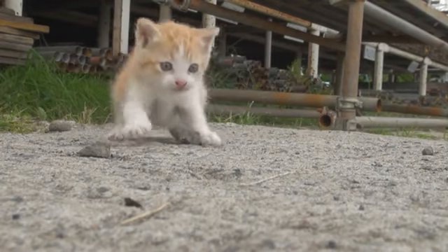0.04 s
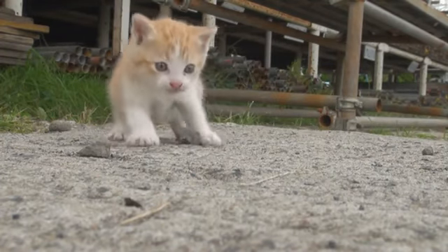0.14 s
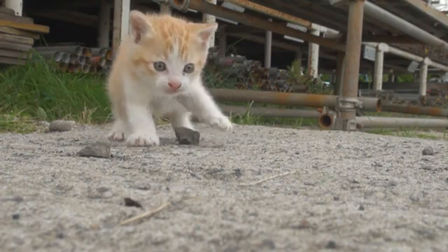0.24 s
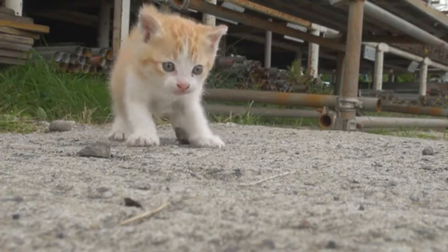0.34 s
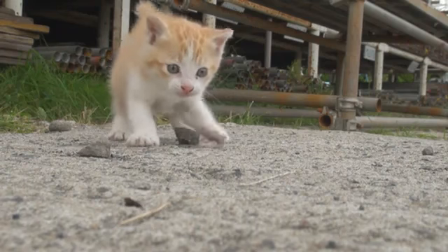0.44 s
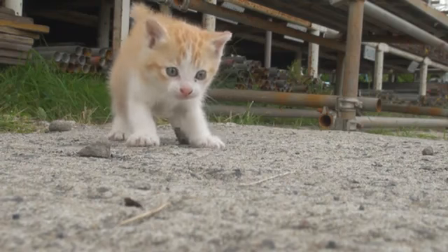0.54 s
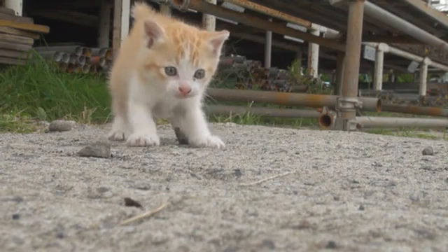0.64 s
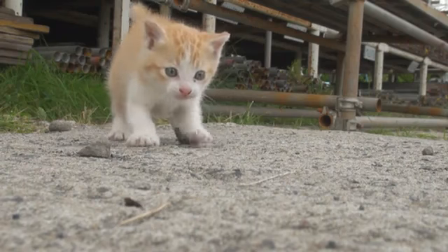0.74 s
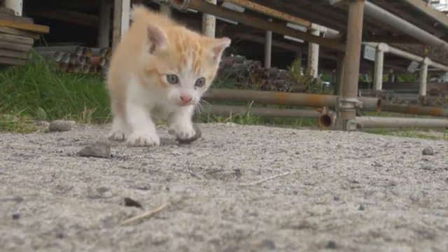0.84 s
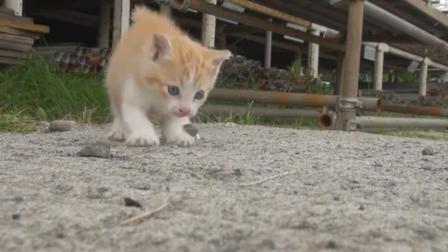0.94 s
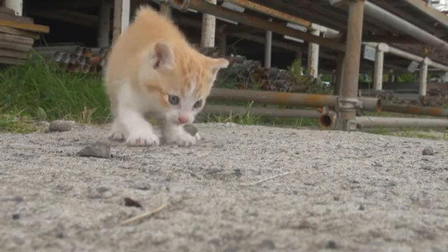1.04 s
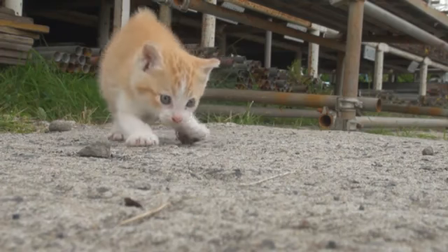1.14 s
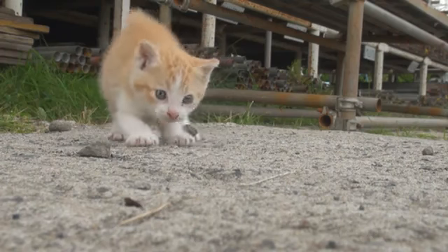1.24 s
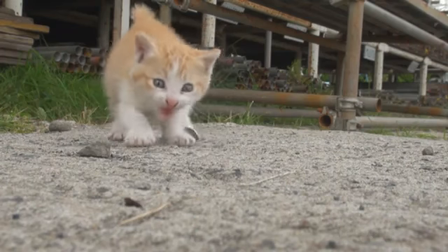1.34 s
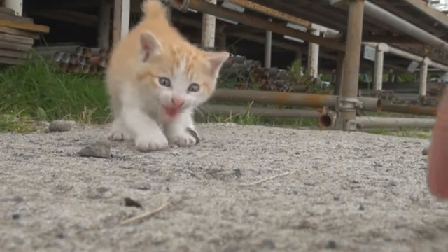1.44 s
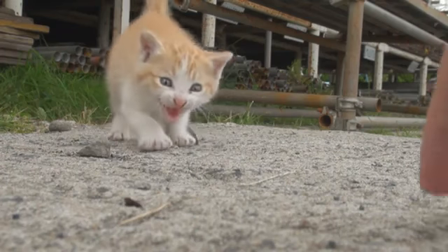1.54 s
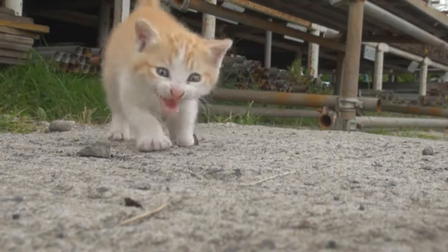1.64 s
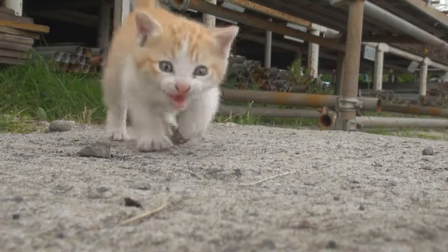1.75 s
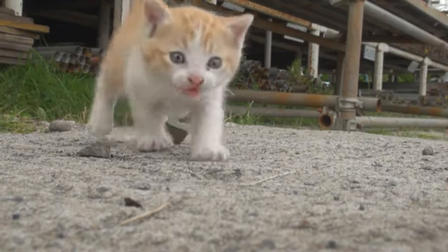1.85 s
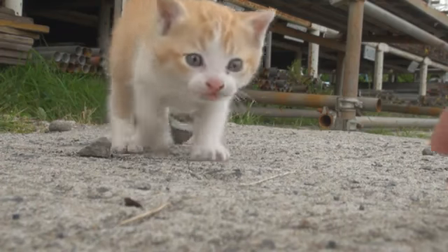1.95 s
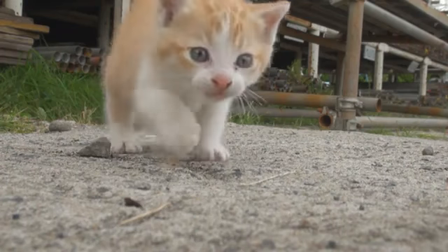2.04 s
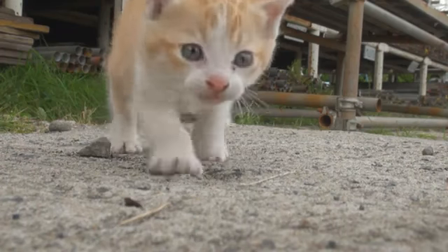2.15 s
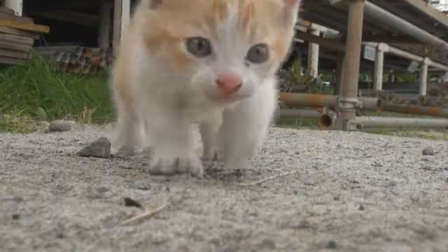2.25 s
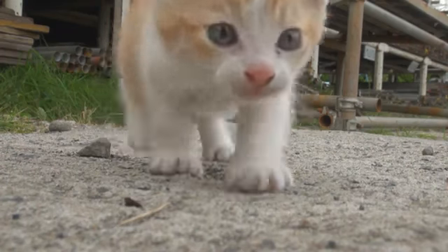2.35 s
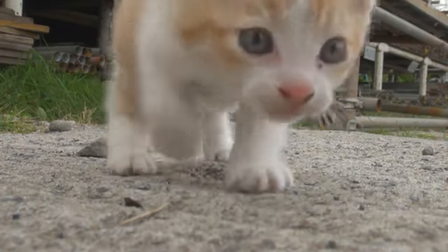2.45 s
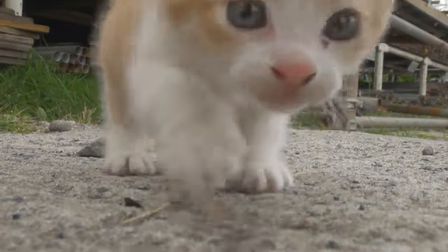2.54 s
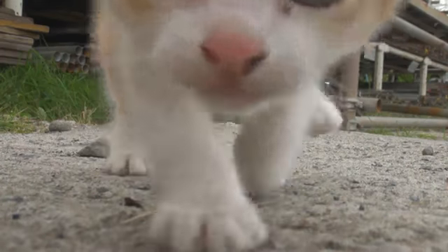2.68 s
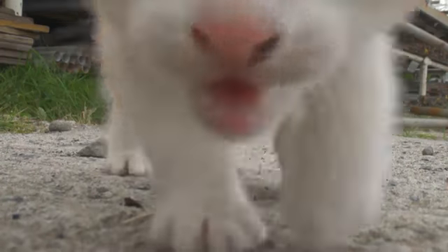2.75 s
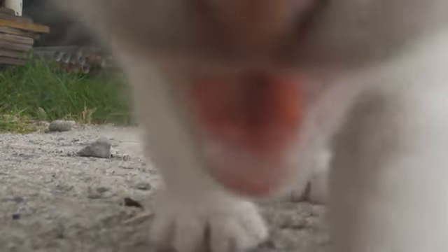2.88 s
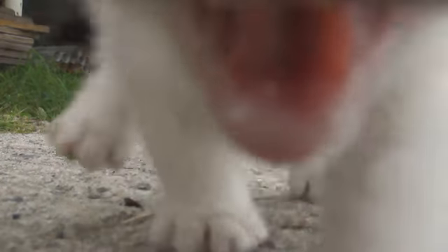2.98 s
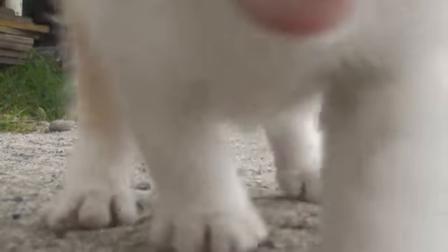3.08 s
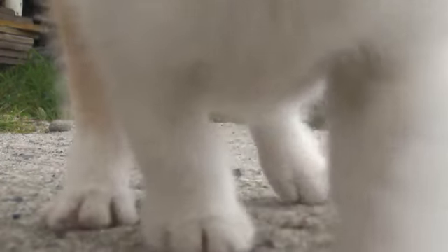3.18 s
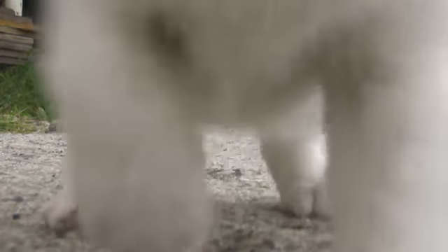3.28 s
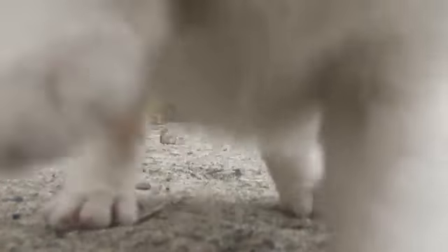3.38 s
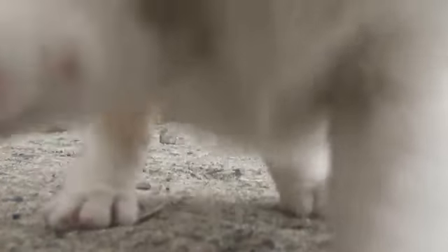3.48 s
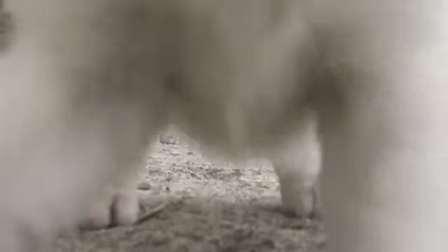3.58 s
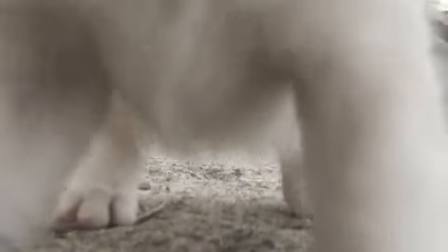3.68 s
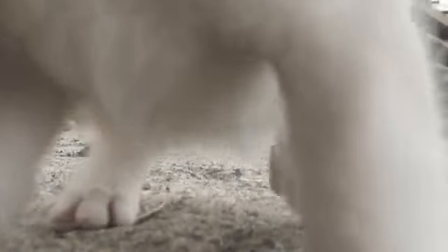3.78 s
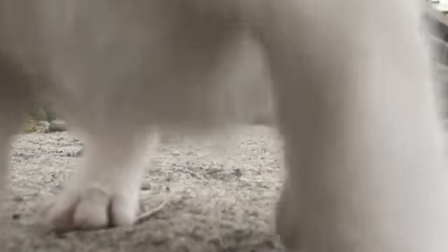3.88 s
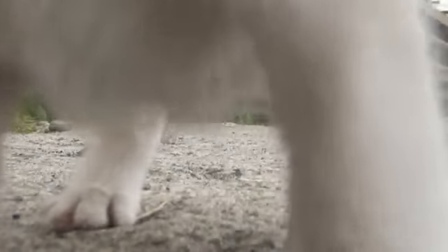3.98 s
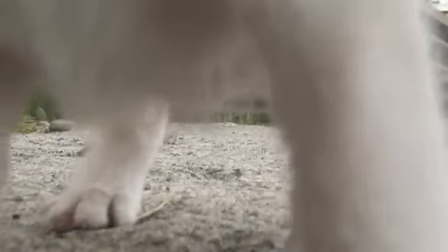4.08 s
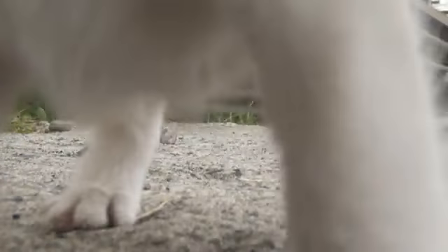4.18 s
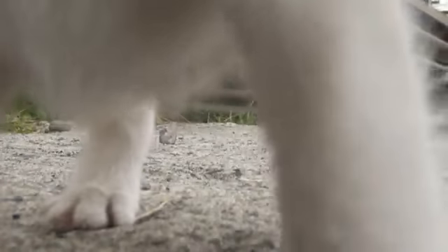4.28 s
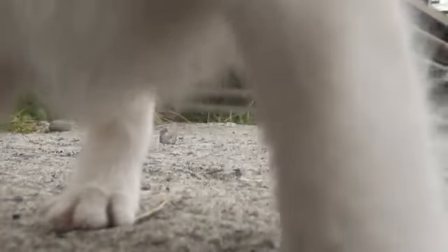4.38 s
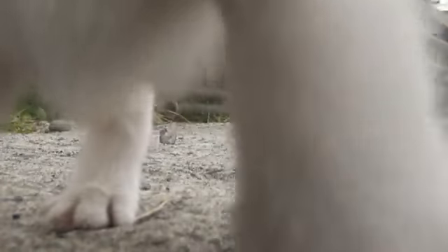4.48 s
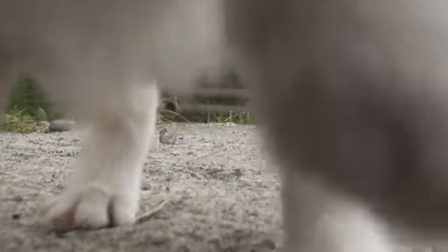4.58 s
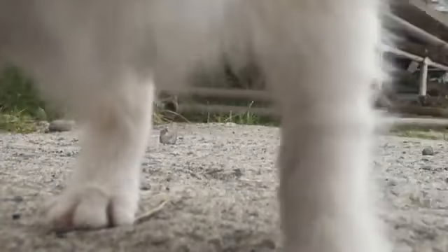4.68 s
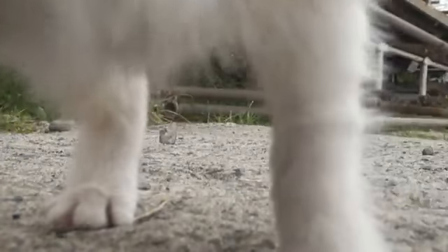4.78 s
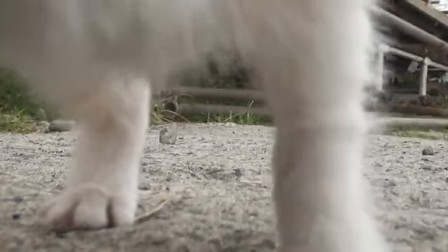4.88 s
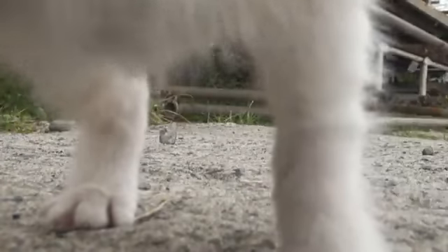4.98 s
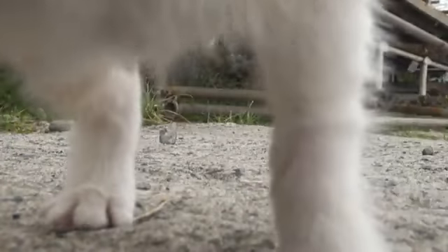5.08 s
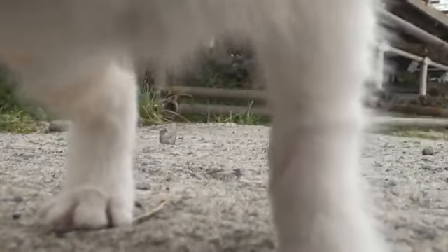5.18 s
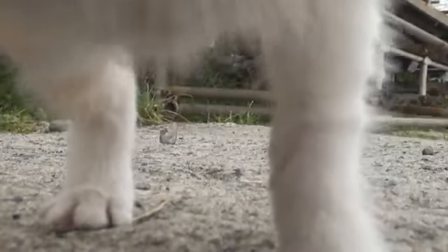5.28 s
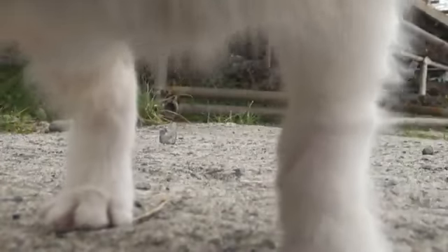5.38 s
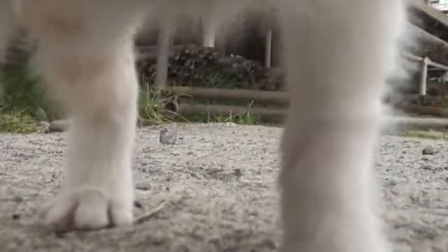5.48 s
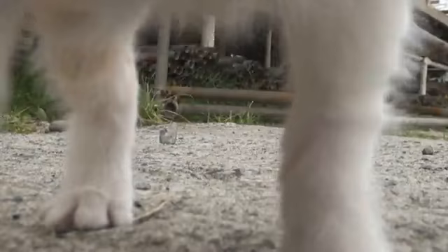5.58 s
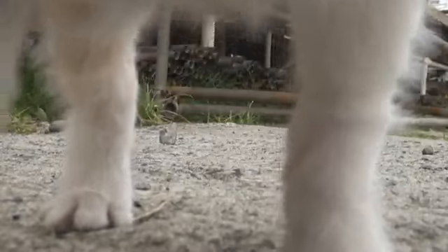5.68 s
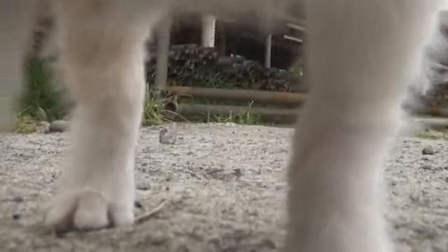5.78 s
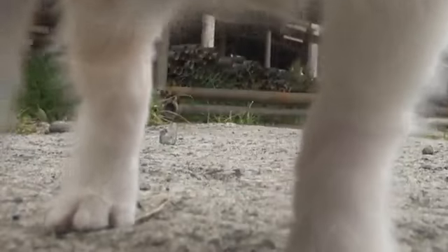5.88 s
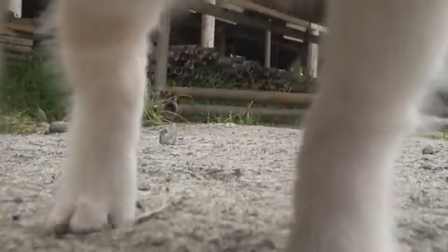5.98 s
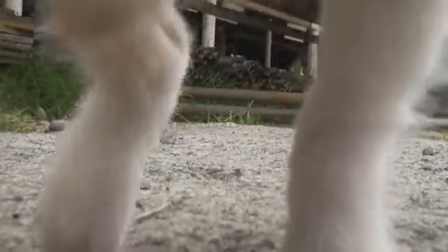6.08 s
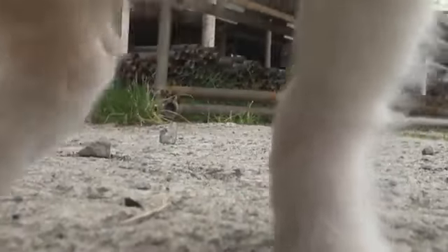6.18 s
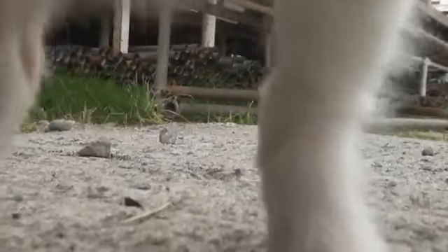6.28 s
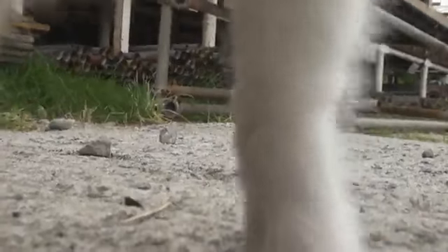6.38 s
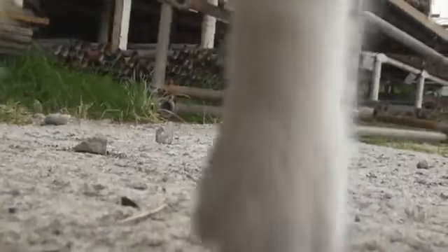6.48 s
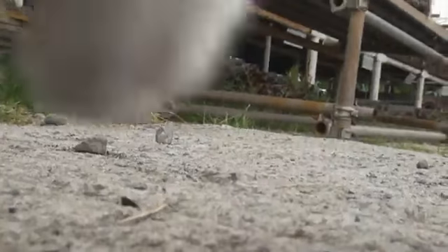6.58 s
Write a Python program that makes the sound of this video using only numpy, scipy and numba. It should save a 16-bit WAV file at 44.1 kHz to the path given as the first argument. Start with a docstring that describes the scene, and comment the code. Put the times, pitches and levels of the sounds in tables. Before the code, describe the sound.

A low rumble and hum run throughout in an open yard. For the first second and a half a soft rustle swells and fades, and from about 0.2 to 1 second a thin, wavering whine sounds far off to the left. At 1.5 seconds a very young kitten gives a high mew of half a second, rising and falling in pitch. A much louder mew follows right at the microphone from 3 to 3.6 seconds, slightly overloading it. Two more close mews come from 4.6 to 5.3 and from 5.6 to 6.5 seconds, a little lower and hoarse at the edges. Each ends with a small puff of air and a soft bump. Sparse ticks of grit under the paws and wet mouth clicks fall between the calls, clearest just before the third. A short, sharp knock close to the microphone comes at 6.6 seconds.

```python
"""A concrete yard, a camera on the ground. A very young kitten walks up and mews four times, at last
right at the microphone. Each mew is a train of sharp vocal-fold pulses that arches in pitch and rings a
closing mouth; the near ones overload the recorder. First a thin whine comes from far off through a soft
rustle. Grit ticks under the paws, and a low hum runs underneath."""
import sys
import numpy as np
from scipy import signal
from scipy.fft import rfft, irfft
from scipy.io import wavfile
from scipy.ndimage import uniform_filter1d, map_coordinates
from numba import njit

SR = 44100
rng = np.random.default_rng(int(sys.argv[2]) if len(sys.argv) > 2 else 0)


def inscribe(sig):
    """Save sig as 16-bit PCM at rate SR to the path in sys.argv[1].

    A 1-D sig is mono; a 2-D sig holds one channel per row.
    Samples are clipped to [-1, 1] before scaling.
    """
    pcm = np.round(np.clip(np.atleast_2d(sig).T, -1, 1) * 32767)
    wavfile.write(sys.argv[1], SR, pcm.astype(np.int16))


N = 292369
TIME = np.arange(N) / SR

# rumble and air of the yard: (frequency [Hz], relative density [dB])
YARD_COLOUR = [(13, -56), (22, -15), (48, -3.5), (70, -0.5), (91, -5), (128, -2.5), (150, -3.5), (222, -4),
               (396, -15), (440, -14), (1200, -20.5), (3080, -28), (5490, -34), (8810, -39.5),
               (11800, -42.5), (15300, -82), (22000, -120)]
# how alike the yard sounds at the microphone's two ports: (frequency [Hz], likeness [0-1])
YARD_LIKENESS = [(60, 1), (130, 1), (270, 1), (570, 0.79), (1200, 0.57), (2530, 0.62), (5350, 0.92),
                 (11300, 0.78)]
# tones of the hum: (frequency [Hz], level [dB])
HUM_TONES = [(60, -57), (120.3, -38), (152, -47)]
# the background dips as the kitten stands over the microphone: (middle [s], half length [s], depth [dB])
YARD_DIPS = [(4.944, 0.19, -16), (5.443, 0.12, -5), (5.81, 0.11, -5.5)]
# swell of the rustle: (time [s], level [dB])
RUSTLE_SWELL = [(0.0, -38.5), (0.106, -35), (0.18, -42.5), (0.404, -30), (0.918, -36), (0.988, -29.5),
                (1.438, -46.5), (1.48, -41)]
# spectrum of its hiss: (frequency [Hz], relative density [dB])
RUSTLE_SPECTRUM = [(1180, -27), (2000, 3.5), (2520, 2), (3340, 1.5), (3840, 3.5), (5520, 2.5), (8680, -2.5),
                   (11800, -13), (15300, -47), (22000, -120)]
# the far whine: (time [s], pitch [Hz], level [dB], overtones against the fundamental [dB])
WHINE_PATH = [(.174, 576, -26, -1), (.2, 620.6, -21, -6), (0.227, 748, -42, 13), (0.309, 850, -30.5, -11),
              (.375, 1200, -37, -3), (.415, 1156, -58, -12), (.452, 871, -27, -19),
              (0.529, 909, -28.5, -10), (.595, 1110, -32, -23), (.638, 865, -31, -9), (.82, 826, -39.5, 8),
              (0.933, 888, -30, -15), (1.05, 820, -40, -2)]
# air let out as the mouth shuts: (time [s], length [s], level at the crest [dB])
MOUTH_PUFFS = [(1.958, 0.032, -38), (3.514, 0.086, -13), (5.255, 0.079, -16), (6.429, 0.077, -25.5)]
# spectrum of that air: (frequency [Hz], relative density [dB])
PUFF_SPECTRUM = [(240, -34), (400, 8), (756, 14), (1050, 7), (1980, 12), (2280, 7), (3110, 8.5), (4760, 7),
                 (6870, 18.5), (8370, 0), (11800, 9), (15300, -34), (22000, -120)]
# bumps and a last knock, close up: (time [s], length [s], pitch [Hz], width [Hz], level [dB])
CLOSE_BUMPS = [(1.961, 0.014, 758, 600, -31.5), (3.537, 0.032, 423, 218, -16),
               (5.195, 0.032, 84.15, 108.5, -17), (5.272, 0.021, 794, 495.7, -26),
               (6.28, 0.011, 1090, 900, -19.5), (6.442, 0.045, 397, 222, -27.5),
               (6.6245, 0.0048, 1300, 900, 1)]
# grit and wet mouth clicks: (time [s], peak [dB], centre [Hz])
GRIT_AND_CLICKS = [(2.2177, -21.5, 4570), (2.477, -28, 5000), (3.725, -26.5, 9150), (3.807, -27, 5000),
                   (4.411, -21.5, 8000), (4.587, -18, 6900), (4.596, -12.5, 1800), (4.599, -25, 9550),
                   (4.605, -9.5, 10200), (5.603, -23, 5800), (6.612, -23, 5000)]
# voice of each mew: (relative throat level with jaw open [dB], with jaw shut [dB],
# relative edge level [dB], breathiness [0-1], damping [factor], treble pan to the left [dB])
MEW_VOICES = [(-4.5, -2.5, -21, .06, 1.7, -1.5), (-18, 3, 1.5, 0.06, 1.48, -1.5),
              (-25, 6, -7.5, .09, 1.04, 3), (2, -15.5, -27, 0.04, 1.19, 5)]
# pitch arch, one list a mew: (time [s], pitch [Hz])
MEW_PITCHES = [
    [(1.49, 274), (1.514, 405), (1.554, 441), (1.655, 647), (1.712, 679.5), (1.75, 602), (1.838, 497),
     (1.918, 221), (1.96, 174)],
    [(2.95, 305), (2.986, 453), (3.014, 399.8), (3.142, 577), (3.2, 500), (3.29, 522.3), (3.32, 510),
     (3.398, 502.7), (3.446, 525.7), (3.495, 495), (3.555, 322)],
    [(4.62, 192), (4.684, 389.7), (4.728, 411), (4.76, 448), (4.888, 485.8), (4.988, 445), (5.04, 394.6),
     (5.18, 313.6), (5.26, 195.8)],
    [(5.625, 176), (5.665, 254.6), (5.709, 385.5), (5.745, 468.5), (5.91, 546), (5.953, 575), (6.05, 560.6),
     (6.095, 573.2), (6.189, 500.7), (6.285, 408), (6.381, 353.4), (6.46, 230.5)],
]
# effort and jaw, one list a mew:
# (time [s], effort [dB], mouth resonance [Hz], upper resonance [Hz], upper against mouth [dB])
MEW_JAWS = [
    [(1.49, -35, 3900, 8200, -9), (1.53, -24, 3960, 7700, -3), (1.594, -17.5, 4070, 6500, 1),
     (1.724, -10.5, 3810, 5600, -3.5), (1.862, -21, 2900, 5800, -7.5), (1.96, -45, 2440, 6450, 2)],
    [(2.95, -27, 4530, 6850, -2), (2.972, -27, 4600, 6700, 4), (2.984, -13.5, 4770, 6400, 5.5),
     (3.11, -13.5, 5030, 5820, 6), (3.178, -7.5, 4520, 5560, -2), (3.225, -10, 4460, 5400, 1),
     (3.26, -5.5, 4140, 6670, -5), (3.392, -6, 3857, 6280, 0), (3.49, 3, 3360, 6100, -7),
     (3.555, -14.5, 3040, 6120, 0.5)],
    [(4.62, -32, 3450, 7400, -4), (4.674, -9.5, 3570, 7300, -5.5), (4.726, -10.5, 4290, 6700, 0),
     (4.822, -9.5, 3690, 6530, -4), (4.984, -10, 3100, 6500, -5.5), (5.04, -11.5, 2807, 6640, -7.5),
     (5.16, -16.5, 2600, 6846, -1), (5.285, -28, 2600, 6800, 2)],
    [(5.625, -25, 3850, 5600, -0.5), (5.66, -15, 3690, 7100, -7.5), (5.725, -18.5, 4200, 6200, 4.5),
     (5.8, -14.5, 4570, 5600, 4.5), (5.865, -20.5, 3650, 5580, 11), (5.915, -9, 3650, 5640, -1),
     (6.02, -6.5, 3520, 6020, -3.5), (6.187, -4.5, 2960, 5880, -14.5), (6.359, -16.5, 2800, 5360, -7),
     (6.46, -30.5, 2840, 5950, 0)],
]
# brief cracks of the voice: (middle [s], half length [s], added roughness [0-1])
VOICE_CRACKS = [(1.69, 0.02, 0.15), (3.12, 0.038, .24), (6.285, 0.014, 0.13)]

TOP_HZ = 16000  # band limit of the pulses and of the recorder
TAUT_HZ, SLACK_HZ = 530, 205  # pitches at which the folds start to slacken and are fully slack
OPEN_HZ, SHUT_HZ = 4100, 2455  # mouth resonance with the jaw open and nearly shut
THROAT_OPEN_HZ, THROAT_SHUT_HZ = 2160, 1505
EASY_DB, STRAINED_DB = -6.5, -4.5  # efforts between which the cry tightens into the mouth resonance
FUNDAMENTAL_DB, MEW_CEILING_DB = -18, -5  # level of the weak fundamental; ceiling on each mew's loudness
ATTACK_S, ATTACK_DB = 0.021, -2.5  # each mew swells in from this far down
ONSET_S, ONSET_ROUGH, ONSET_THROAT_DB = 0.16, 0.13, -5.5  # the voice starts hoarse and thin, then clears
CLEAR_ROUGH, SHUT_ROUGH, SLACK_ROUGH = 0.025, 0.13, 0.38
SLACK_DAMPING, CRACK_DAMPING, STRAIN_DAMPING_FACTOR = 0.87, 2.4, 0.52
SLACK_THROAT_DB, SLACK_BUZZ_DB = 13.5, 12.5
STRAIN_THROAT_DB, STRAIN_EDGE_DB, SHUT_EDGE_DB = -4, -12, -0.5


def gain_of(db):
    """Decibels to amplitude."""
    return 10 ** (np.asarray(db) / 20)


def pan(left_db):
    """Left and right gains, left_db apart."""
    return gain_of([[left_db / 2], [-left_db / 2]])


def unit_rms(x):
    """Scales to rms 1."""
    return x / np.sqrt(np.mean(x ** 2) + 1e-20)


def running_rms(x, size=600):
    """The rms over a few neighbouring pulses."""
    return np.sqrt(abs(uniform_filter1d(uniform_filter1d(x ** 2, size), size)) + 1e-14)


def levelled(x):
    """Holds the running rms at 1."""
    return x / running_rms(x)


def between(x, zero, one):
    """How far x has gone from one value to another, 0-1."""
    return np.clip((x - zero) / (one - zero), 0, 1)


def humps(rows, t):
    """Smooth humps from rows of (middle, half length, height)."""
    return sum(height * np.exp(-((t - s) / half) ** 2) for s, half, height in rows)


def follow(rows, t):
    """The columns of a curve table at the times t."""
    times, *columns = np.transpose(rows)
    return [np.interp(t, times, column) for column in columns]


def spectrum(points, count):
    """A table spread along log frequency over the FFT bins of count samples."""
    hz, value = np.transpose(points)
    return np.interp(np.log(np.fft.rfftfreq(count, 1 / SR) + 1), np.log(hz + 1), value)


def add(mix, s, sound):
    """Mixes a sound in at time s."""
    part = mix[..., max(round(s * SR), 0):][..., :sound.shape[-1]]
    part += sound[..., :part.shape[-1]]


def noise(colour, count):
    """Noise of rms 1 with a given spectrum."""
    white = rfft(rng.standard_normal(count))
    return unit_rms(irfft(white * gain_of(spectrum(colour, count)), count))


def wander(hz, count):
    """A random drift of rms 1 that rolls off above hz."""
    f = np.fft.rfftfreq(count, 1 / SR)
    white = rfft(rng.standard_normal(count))
    return unit_rms(irfft(white * np.exp(-(f / hz) ** 2) * (f > 0), count))


@njit
def ring(x, pole):
    """One complex pole that may move at every sample."""
    out, state = np.zeros(len(x)), 0j
    for i in range(len(x)):
        state = pole[i] * state + (1 - abs(pole[i])) * x[i]
        out[i] = 2 * state.real
    return out


def resonate(x, hz, width):
    """A resonance whose centre and width in Hz can follow curves."""
    return ring(x, np.exp((2j * hz - width) * np.pi / SR) * np.ones(len(x)))


def formant(x, hz, width, skirt):
    """A resonance with steep skirts, held at rms 1."""
    return levelled(resonate(resonate(x, hz, width), hz, skirt))


def low_pass(x, hz):
    """A steep low-pass on both channels."""
    taps = signal.firwin(401, hz, window=("kaiser", 8), fs=SR)
    return signal.oaconvolve(x, taps[None], "same")


def echoes(x, t60, db):
    """Sparse reflections that die away, different at each port of the microphone."""
    t = TIME[:SR // 2]
    taps = rng.standard_normal((2, len(t))) * (rng.random((2, len(t))) < .1) * gain_of(-60 * t / t60)
    taps /= np.linalg.norm(taps, axis=1, keepdims=True)
    return gain_of(db) * signal.fftconvolve(x, taps, axes=1)[:, :N]


def yard(rumble_db=-30, waver_hz=0.66, lean=0.087):
    """Rumble and faint air, mono in the bass, with a wavering hum; all dips unequally at the two ports."""
    likeness = np.clip(spectrum(YARD_LIKENESS, N), 0, .982)
    middle = irfft(rfft(noise(YARD_COLOUR, N)) * np.sqrt((1 + likeness) / 2), N)
    side = irfft(rfft(noise(YARD_COLOUR, N)) * np.sqrt((1 - likeness) / 2), N)
    out = gain_of(rumble_db) * np.array([middle + side, middle - side])
    for hz, db in HUM_TONES:
        turns = np.cumsum(hz + waver_hz * wander(2, N)) / SR
        out += gain_of(db) * unit_rms(np.sin(2 * np.pi * turns))
    return out * gain_of(np.outer([1 + lean, 1 - lean], humps(YARD_DIPS, TIME)))


def rustle(spread=0.1, grain_db=0.5, body_db=-5):
    """A soft, slightly grainy hiss near the centre that swells and dies away."""
    def hiss():
        air = noise(RUSTLE_SPECTRUM, N)
        body = unit_rms(resonate(rng.standard_normal(N), hz=2160, width=1900))
        return air + gain_of(body_db) * body

    middle, side = hiss(), spread * hiss()
    level = gain_of(follow(RUSTLE_SWELL, TIME)[0] + grain_db * wander(120, N))
    fade = np.clip((1.6 - TIME) / 0.23, 0, 1)
    return level * fade * np.array([middle + side, middle - side])


def whine(waver=0.008, pan_db=5, third_db=-8, flutter_db=2):
    """Far off to the left, a thin whine of three harmonics slides up and settles."""
    t = np.arange(WHINE_PATH[0][0], WHINE_PATH[-1][0], 1 / SR)
    hz, db, overtones_db = follow(WHINE_PATH, t)
    angle = 2 * np.pi * np.cumsum(hz * (1 + waver * wander(80, len(t)))) / SR
    overtones = np.sin(2 * angle) + gain_of(third_db) * np.sin(3 * angle)
    tone = np.sin(angle) + gain_of(overtones_db) * overtones
    level = gain_of(db + flutter_db * wander(21.5, len(t))) * signal.windows.tukey(len(t), .012)
    out = np.zeros((2, N))
    add(out, t[0], level * tone * pan(pan_db))
    return out


def puffs():
    """The mouth shuts on each mew with a short hiss of air."""
    out = np.zeros((2, N))
    for s, length, db in MOUTH_PUFFS:
        count = round(length * SR)
        add(out, s, gain_of(db) * noise(PUFF_SPECTRUM, count) * np.hanning(count))
    return out


def bumps():
    """Dull bumps and a last knock close to the microphone: bursts of resonant noise."""
    out = np.zeros((2, N))
    for s, length, hz, width, db in CLOSE_BUMPS:
        count = round(length * SR)
        band = resonate(resonate(rng.standard_normal(SR // 4), hz, width), hz, width)
        add(out, s, gain_of(db) * unit_rms(band[-count:] * np.hanning(count)))
    return out


def ticks(decay_s=0.0022, width_hz=4500):
    """Grit under the paws and wet clicks of the mouth: bright noise that dies at once."""
    out = np.zeros((2, N))
    t = TIME[:SR // 50]
    for s, db, hz in GRIT_AND_CLICKS:
        tick = resonate(rng.standard_normal(len(t)) * np.exp(-t / decay_s), hz, width_hz)
        add(out, s, gain_of(db) * tick / abs(tick).max())
    return out


def close_reflections(x, ground_s=0.00033, echo_db=-16, step=1.7, sway=0.1255):
    """Echoes off ground, legs and camera; their delays sway as the kitten moves, rippling the spectrum."""
    samples = np.arange(len(x))
    out = np.array([x, x])
    for k in range(6):
        delay_s = ground_s * step ** k * np.exp(sway * wander(1.956, N)[:len(x)])
        echo = map_coordinates(x, [samples - delay_s * SR], order=3)
        out += gain_of(echo_db) * (-1) ** k * rng.uniform(.7, 1.3, (2, 1)) * echo
    return out * running_rms(x) / running_rms(out)


def vocal_folds(hz, rough, slack, jitter=0.0756, fry_jitter=0.0596, shimmer=0.96, air_hz=3100):
    """Sharp pulses, each with a puff of air; rough or slack folds beat unevenly."""
    count = len(hz)
    unevenness = jitter * rough + fry_jitter * slack ** 4
    hz = hz * (1 + unevenness * wander(183, count))
    turns = np.cumsum(hz) / SR
    from_pulse_s = ((turns + .5) % 1 - .5) / hz
    pulses = np.sinc(2 * TOP_HZ * from_pulse_s) * np.exp(-(from_pulse_s * TOP_HZ / 2) ** 2)
    pulses = levelled(signal.lfilter([1, -1], [1, -.97], pulses))  # blocks DC
    pulses *= np.exp(shimmer * rough * wander(190, count))
    air = (.5 + np.exp(-2 * (turns % 1))) * rng.standard_normal(count)
    high_pass = signal.butter(3, air_hz, "high", fs=SR, output="sos")
    return pulses, unit_rms(signal.sosfilt(high_pass, air)), turns


def at_microphone(t, treble, throat, turns, pan_db, port_turn=0.35):
    """Close up the fundamental is fuller and the low harmonics reach the two ports out of step."""
    nearness = np.interp(t, [1.5, 3], [.4, 1])
    low = throat + gain_of(FUNDAMENTAL_DB) * nearness * np.sin(2 * np.pi * turns)
    side = port_turn * nearness * signal.hilbert(low).imag
    return close_reflections(treble) * pan(pan_db) + low + np.outer([1, -1], side)


def mew(voice, pitch, jaw, throat_trim_db=-9.5, edge_trim_db=-15.5, buzz_db=-12, rasp_db=14, trim_db=0.5):
    """Fold pulses ring five resonances, coloured by slack folds, a shutting jaw and strain."""
    open_db, shut_db, edge_db, breath, damping, pan_db = voice
    t = np.arange(jaw[0][0], jaw[-1][0], 1 / SR)
    age = t - t[0]
    hz = follow(pitch, t)[0]
    effort_db, mouth_hz, upper_hz, upper_db = follow(jaw, t)
    slack = between(hz, TAUT_HZ, SLACK_HZ)
    shut = between(mouth_hz, OPEN_HZ, SHUT_HZ)
    strain = between(effort_db, EASY_DB, STRAINED_DB)
    onset = np.exp(-age / ONSET_S)
    crack = humps(VOICE_CRACKS, t)

    rough = CLEAR_ROUGH + SLACK_ROUGH * slack ** 2 + SHUT_ROUGH * shut ** 2 + ONSET_ROUGH * onset + crack
    pulses, air, turns = vocal_folds(hz, rough, slack)
    hiss = (rough + breath) * air

    # strain sharpens the resonances, a crack blurs them; the closing jaw lowers throat and mouth together
    damping = damping * STRAIN_DAMPING_FACTOR ** strain + CRACK_DAMPING * crack
    loose = damping + SLACK_DAMPING * slack
    throat_hz = THROAT_OPEN_HZ + (THROAT_SHUT_HZ - THROAT_OPEN_HZ) * shut
    throat = formant(pulses, throat_hz, width=900 * loose, skirt=2250)
    mouth = formant(pulses + .5 * rough * air, mouth_hz, width=400 * damping + 80 * slack, skirt=4200)
    upper = formant(pulses + 2 * hiss, upper_hz, width=1050 * loose, skirt=2700 + 3000 * slack)
    edge = formant(pulses + 2 * hiss, hz=10900, width=1500 * loose, skirt=2200)
    # a breathy buzz near 6 kHz, stronger with damping, fills the valley between the other resonances
    buzz = formant(pulses + .88 * hiss, hz=5900, width=1330, skirt=3700)

    throat_db = throat_trim_db + open_db + (shut_db - open_db) * shut
    throat_db += SLACK_THROAT_DB * slack + STRAIN_THROAT_DB * strain + ONSET_THROAT_DB * onset
    edge_db += edge_trim_db + SHUT_EDGE_DB * shut + STRAIN_EDGE_DB * strain
    treble = mouth + gain_of(upper_db) * upper + gain_of(edge_db) * edge
    treble -= gain_of(buzz_db + SLACK_BUZZ_DB * slack) * damping / 2 * buzz
    treble += gain_of(rasp_db) * breath * shut ** 2 * air  # air rasps through the closing jaw
    ports = at_microphone(t, treble, gain_of(throat_db) * throat, turns, pan_db)
    level_db = trim_db + np.minimum(effort_db, MEW_CEILING_DB) + ATTACK_DB * (1 - between(age, 0, ATTACK_S))
    return t[0], ports * gain_of(level_db) * signal.windows.tukey(len(t), .02)


def scene():
    """The kitten is near and almost dry; the whine is far and carries the yard's echo."""
    kitten = puffs() + bumps() + ticks()
    for voice, pitch, jaw in zip(MEW_VOICES, MEW_PITCHES, MEW_JAWS):
        add(kitten, *mew(voice, pitch, jaw))
    far = whine()
    near = kitten + echoes(kitten, t60=.01, db=-24) + echoes(kitten, t60=.15, db=-40)
    return near + far + echoes(far, t60=0.083, db=-5) + rustle() + yard()


def record(dry, ceiling=0.89, hardness=7, band_hz=11950):
    """The recorder rounds off peaks, limits the band and clips what overshoots full scale."""
    rounded = dry / (1 + abs(dry / ceiling) ** hardness) ** (1 / hardness)
    clipped = np.clip(low_pass(rounded, band_hz), -1, 1)
    return low_pass(clipped, TOP_HZ)


dry = scene()
out = record(dry)
inscribe(out)
```